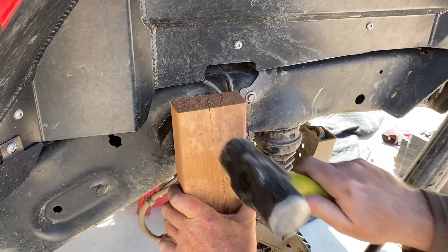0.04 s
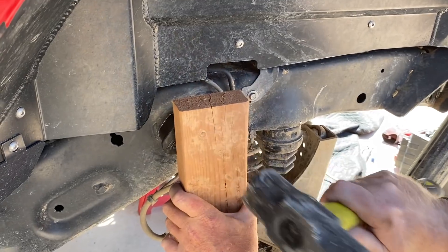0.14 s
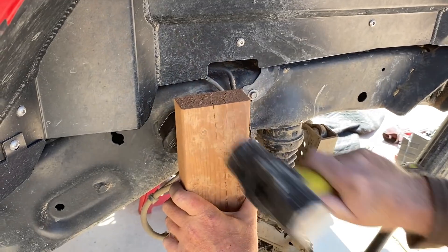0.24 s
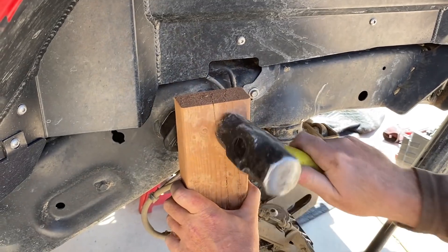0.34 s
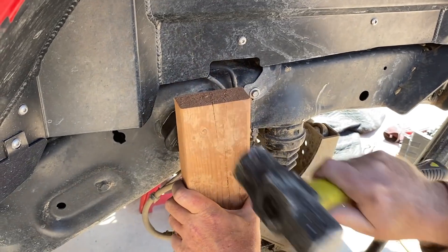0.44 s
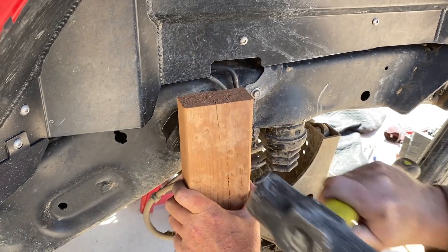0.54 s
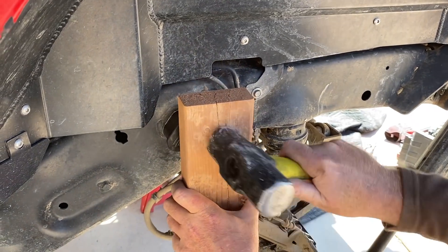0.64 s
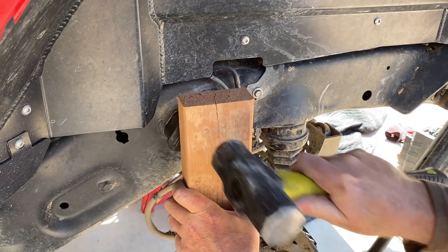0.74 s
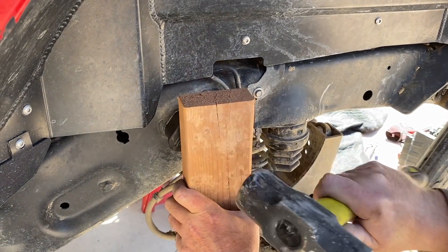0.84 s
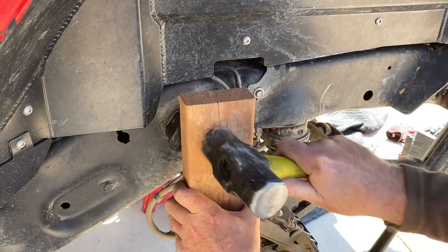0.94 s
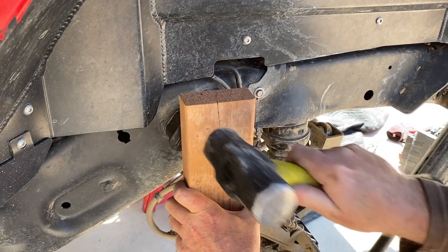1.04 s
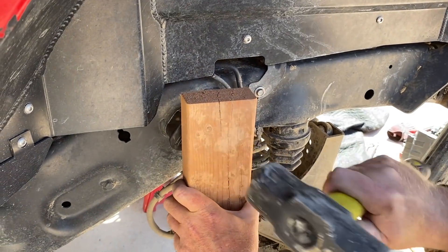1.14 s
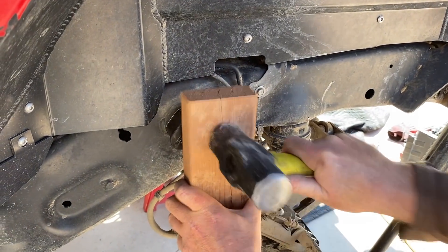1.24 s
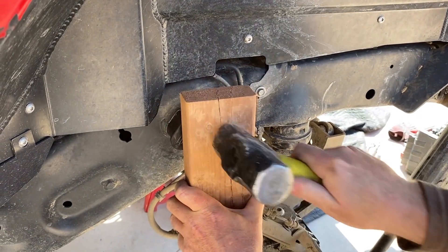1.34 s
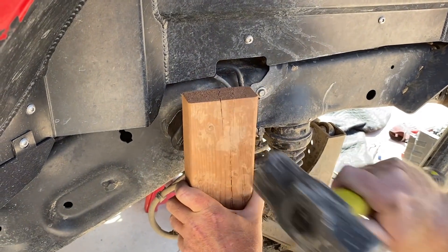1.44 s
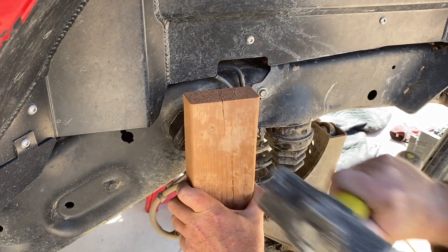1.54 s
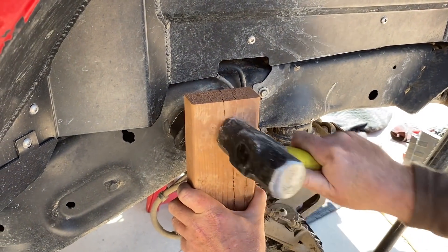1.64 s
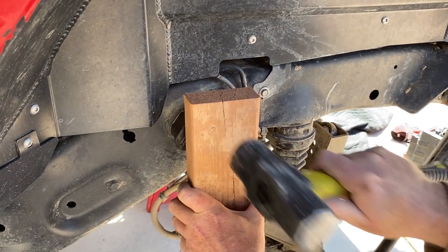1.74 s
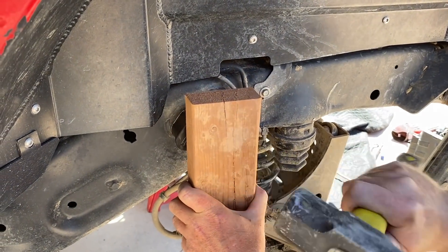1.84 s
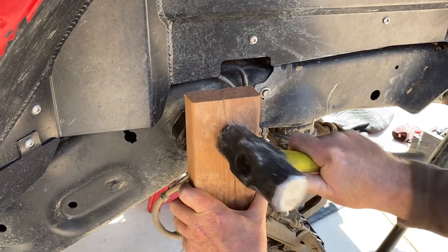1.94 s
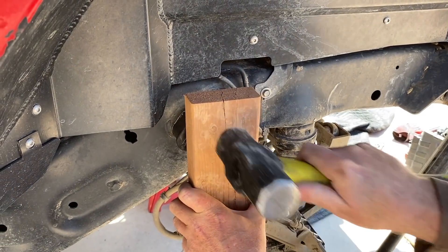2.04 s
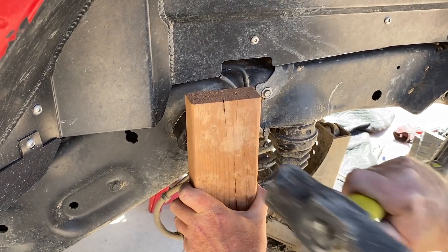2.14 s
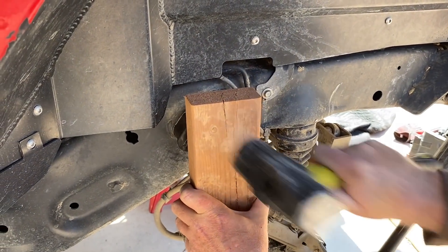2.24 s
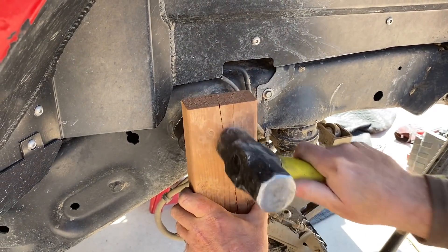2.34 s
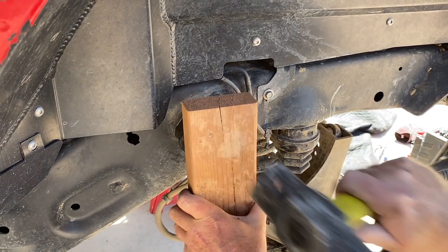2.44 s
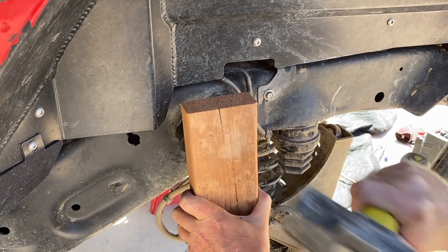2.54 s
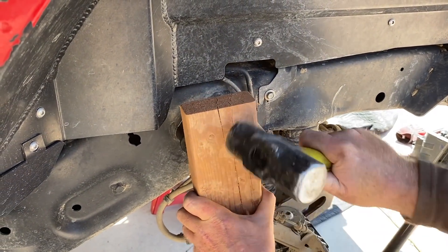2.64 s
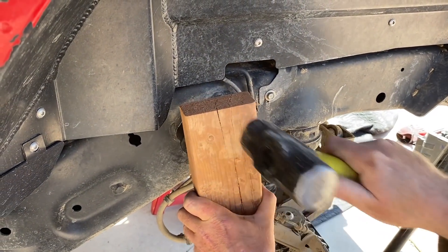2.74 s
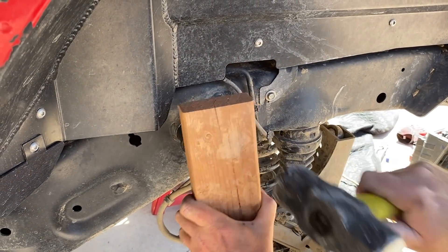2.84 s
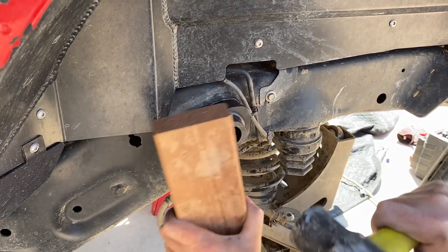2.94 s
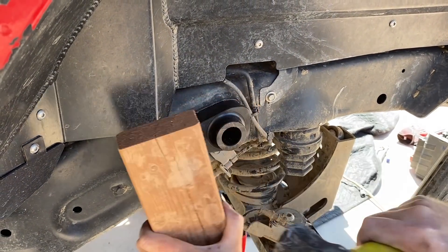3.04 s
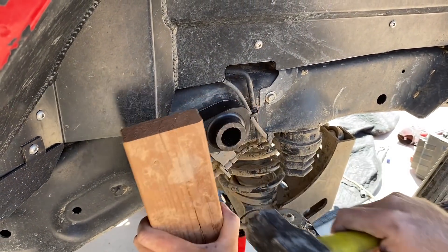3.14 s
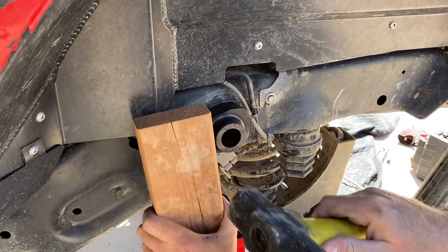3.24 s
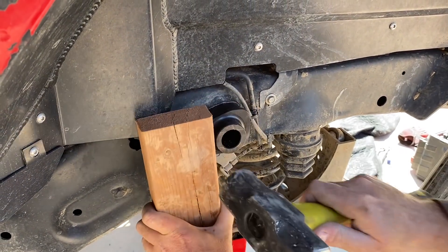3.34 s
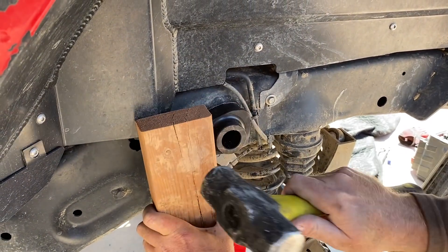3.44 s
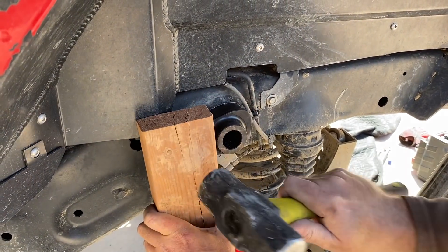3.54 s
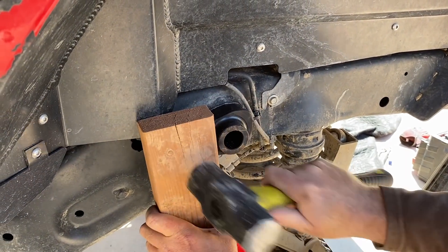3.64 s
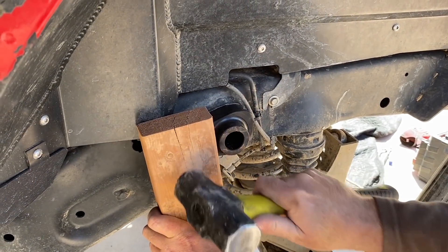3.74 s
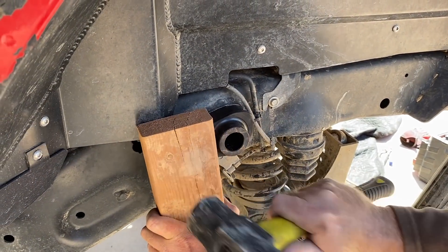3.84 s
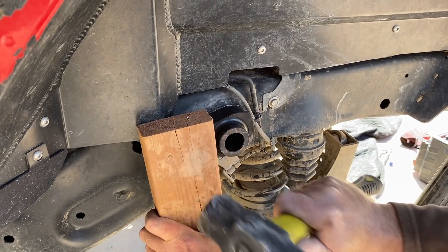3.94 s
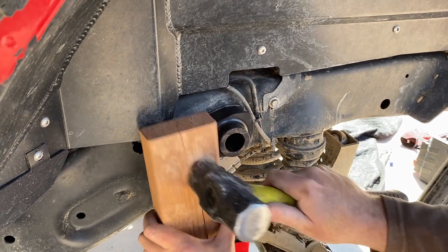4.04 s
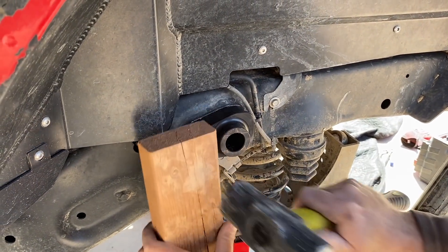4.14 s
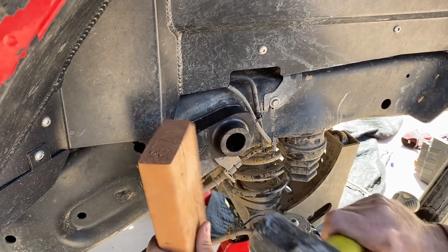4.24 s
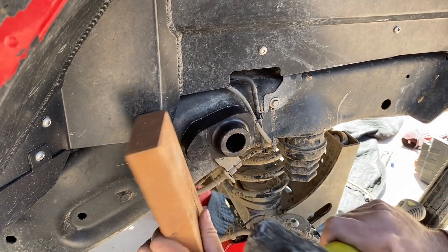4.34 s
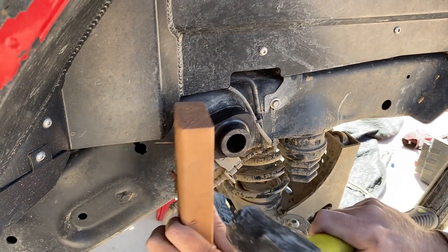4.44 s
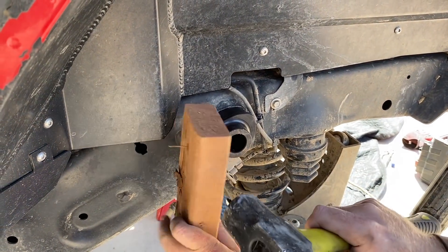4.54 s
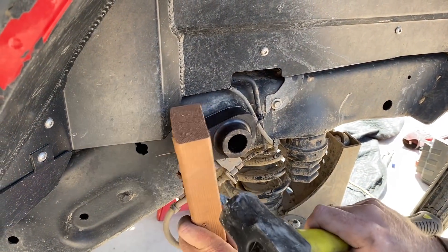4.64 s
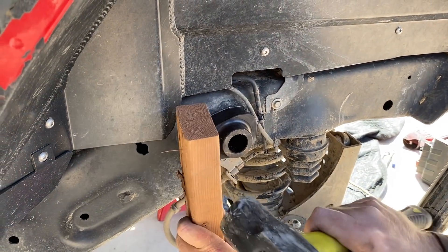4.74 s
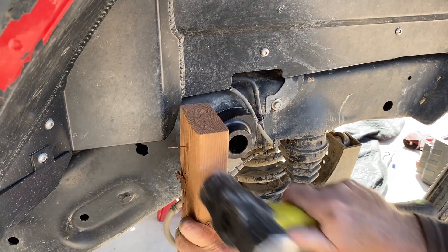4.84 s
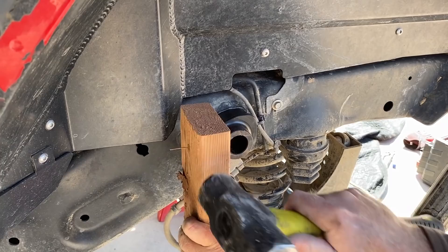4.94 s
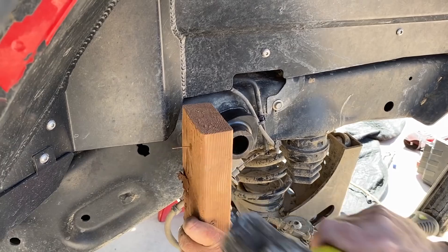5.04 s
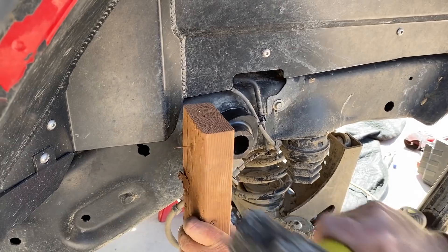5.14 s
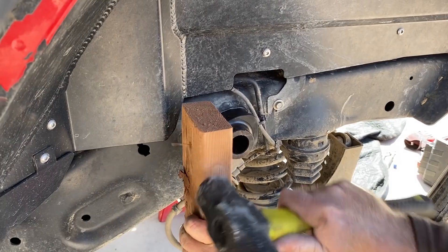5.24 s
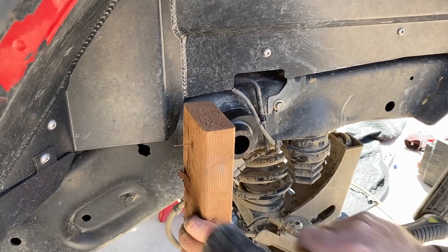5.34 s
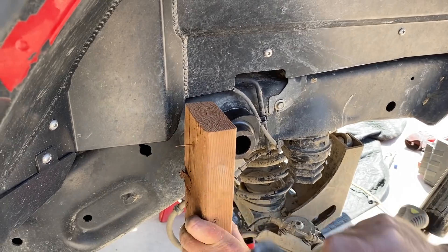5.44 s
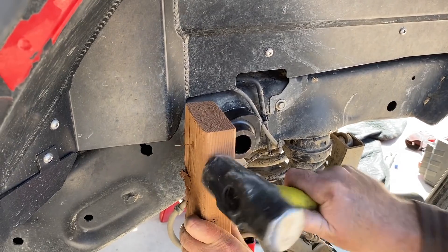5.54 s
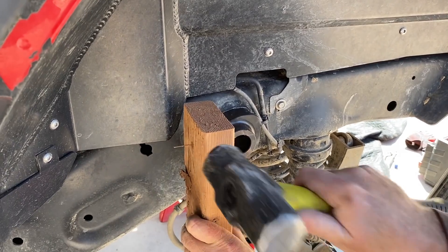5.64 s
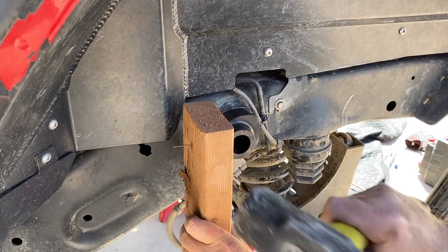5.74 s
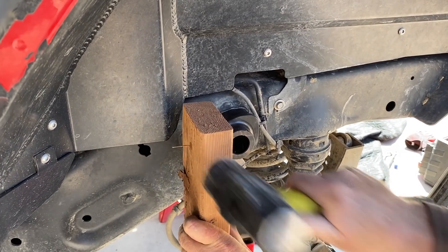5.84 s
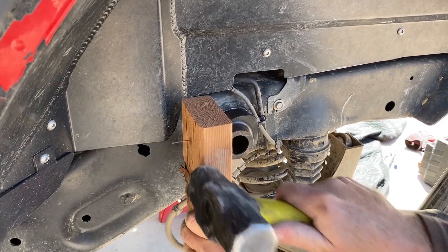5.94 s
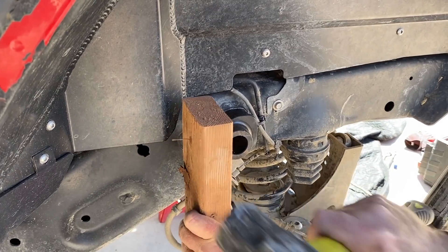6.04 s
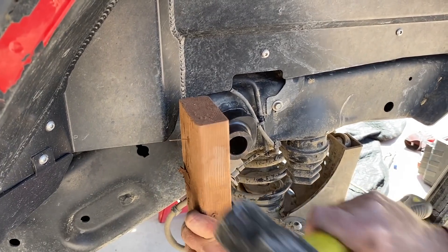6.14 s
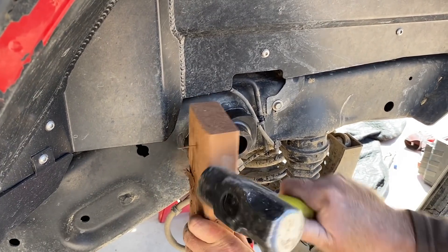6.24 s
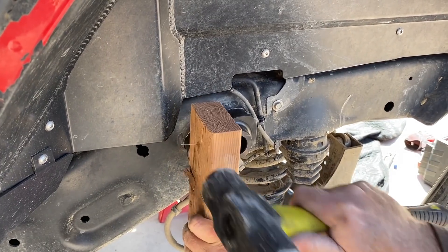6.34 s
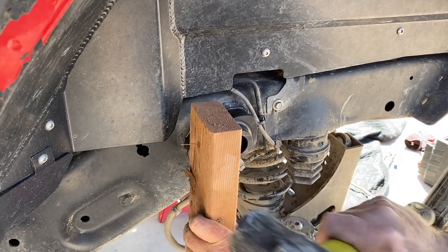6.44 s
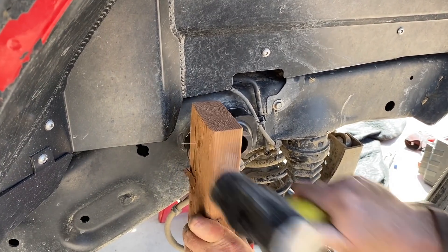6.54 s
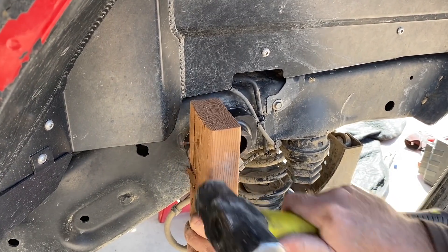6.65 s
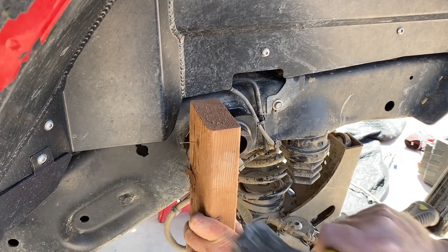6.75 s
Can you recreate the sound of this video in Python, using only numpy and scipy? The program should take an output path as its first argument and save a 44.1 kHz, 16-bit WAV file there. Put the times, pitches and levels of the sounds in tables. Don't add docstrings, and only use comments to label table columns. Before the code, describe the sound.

Outdoors, close to a small microphone, a hammer strikes a hand-held wooden block against a vehicle frame. Loud, woody knocks come three a second, each with a brief metallic rumble. After about nine blows the block is shifted with a scrape and tap, gets two duller knocks, is turned with another scrape, then six brighter blows follow. Faint yard hum lies underneath.

```python
import sys
import numpy as np
from scipy import signal
from scipy.fft import rfft, irfft, next_fast_len
from scipy.io import wavfile
from scipy.ndimage import uniform_filter1d, map_coordinates

SR = 44100
rng = np.random.default_rng(int(sys.argv[2]) if len(sys.argv) > 2 else 0)


def makeup_ratio(level_db):
    decades = np.asarray(level_db, float) / 20
    return 10 ** decades


def unload_audio(sound):
    columns = np.transpose(np.atleast_2d(sound))
    steps = np.round(np.clip(columns, -1, 1) * 32767)
    wavfile.write(sys.argv[1], SR, steps.astype(np.int16))


N = 299439

# f/Hz, level/dB
HUM_COLOUR = [(20, -23.5), (35, -2.5), (60, -2), (200, 1.5), (350, -5.5), (600, -9.5), (1300, -22.5),
              (1580, -13), (1900, -24), (3200, -35.5), (6000, -51)]
# t/s, level/dB
HUM_SWELL = [(0, -66.5), (3.2, -60.5), (3.7, -69.5), (4.5, -64), (4.9, -68.5), (5.8, -63), (6.79, -65.5)]
# t/s, level/dB
SWAY = [(0, -40), (.6, -37.5), (1.3, -37), (2.3, -35), (4.9, -42), (5.5, -43), (6.1, -34), (6.79, -42)]
# f/Hz, level/dB
SWAY_COLOUR = [(1, -12.5), (4, 0), (8, 4.5), (13, -10), (22, -20), (36, -33.5), (70, -120)]
# f/Hz, level/dB
HISS_COLOUR = [(1000, -20), (3000, 3), (5000, 2), (8000, 0), (13000, -3), (17000, -5)]
HISS_DB = -81

# delay/s, level/dB, smear/s, centre f/Hz, spread/ln Hz
WALLS = [
    (.0752, -33.5, .0015, 8500, 1.3),
    (.110, -50, .003, 5500, 1),
    (.2205, -50, .004, 2100, .6),
]
# delay/s, level/dB, smear/s, centre f/Hz, spread/ln Hz
CLUTTER = [(.02, -34.5, .025, 13000, .5), (.05, -28.5, .025, 1213, 1.2), (.15, -53.5, .06, 1477, 0.82),
           (.225, -58.5, .04, 1500, .7)]

# hardest grip t/s, level/dB, slide/s
RUB = [(3.14, -80.5, .09), (3.285, -75, .008), (3.345, -66, .018), (4.22, -74, .03), (4.282, -59, .025),
       (4.412, -62, .005), (4.431, -63, .004), (4.449, -59, .012), (4.506, -70, .009), (4.533, -76, .005),
       (4.615, -75, .018), (4.693, -70, .009), (6.268, -72, .015)]
# f/Hz, level/dB
SKIN_COLOUR = [(880, -40), (1500, -17), (3450, -13), (3720, 3), (4000, -6), (8320, -3), (13700, -9),
               (16000, -20)]
# hardest grip t/s, rumble level/dB, rasp level/dB, slide/s
DRAG = [(3.15, -92, -71, 0.111), (3.293, -55, -69, 0.0135), (3.345, -42, -55, 0.012), (3.42, -56, -76, .02),
        (4.415, -45, -56, 0.0092), (4.445, -42.5, -57.5, 0.0222), (4.53, -59.5, -70, .04)]
# f/Hz, level/dB
RUMBLE_COLOUR = [(90, -70), (200, 2), (350, 6), (600, 1), (900, -7), (1500, -22), (5000, -89)]
# f/Hz, width/Hz, level/dB
RASP_MODES = [(1152, 120, 8), (1460, 26, 3), (2302, 59, -6.5), (2580, 82, -1), (3140, 130, -1),
              (4770, 61, -8), (5250, 75, -1)]
# t/s, level/dB, f/Hz
TICKS = [(.298, -64, 2700), (0.512, -65, 12500), (.52, -70.5, 14000), (3.283, -57.5, 996),
         (3.58, -66, 1500), (3.583, -80, 5500), (4.432, -52, 6000), (4.443, -53, 8980), (4.60, -55, 6440),
         (4.60, -57, 1480), (4.74, -56.5, 1190), (4.83, -61, 1500)]
SLIDE_FADE_RATIO = 1.3

# t/s, strength level/dB, thud level/dB, body level/dB, bite level/dB
FIRST_BLOW = [
    (-0.024, -3.5, -21, -19.5, -4),
]
FLAT_BLOWS = [(0.332, 0.91, -22.5, -11.5, -7.5), (0.672, 2.3, -17.5, -12, -14.5),
              (0.995, 0.43, -14, -8.5, -9.5), (1.306, 2.7, -17.5, -15, -14.5),
              (1.658, 4.5, -23, -13.5, -13), (1.996, 4.5, -19.5, -17.5, -13), (2.329, 3, -15.5, -13, -13),
              (2.677, 1.5, -13.5, -14, -12)]
LOOSE_BLOWS = [
    (3.733, -3, -10.5, -17.5, -33),
    (4.1, -8.5, -3, -8.5, -28.5),
]
TOUCH_BLOWS = [
    (3.334, -24, -7.5, -5, -36),
    (4.405, -28, -13, -1, -27),
]
EDGE_BLOWS = [(4.926, -6.5, -21, -4.5, -9), (5.275, -2, -18.5, -17, -9.5), (5.604, 0, -20, -13, -3),
              (5.925, -4, -12.5, -11.5, -7.5), (6.28, -1.5, -14.5, -14.5, -11), (6.63, -2.5, -16, -17, -7)]
# f/Hz, width/Hz, level/dB
FLAT_WOOD = [(437, 54, -9.5), (615, 48, -20.5), (858, 45, -7), (1098, 77, -7.5), (1179, 110, 4.5),
             (1338, 250, -6), (1480, 25, -14.5), (1737, 36, -26.5), (2047, 310, -14), (2788, 340, -7),
             (3470, 660, -25.5), (4080, 230, -22), (5080, 420, -34.5), (6356, 150, -23)]
LOOSE_WOOD = [(335, 26, -6.5), (406, 49, 5.5), (597, 66, -6), (932, 170, 12), (1210, 90, 2.5),
              (1590, 320, -1), (1980, 83, -23.5), (2580, 83, -25), (3540, 780, 10), (6810, 86, -28.5)]
TOUCH_WOOD = [(322, 17, 3), (346, 30, -3), (405.3, 59, 12.5), (477, 38, -23.5), (614, 18, -1.5),
              (783, 12, -9.5), (910, 83, -11), (1250, 140, -11), (2570, 130, -42), (4200, 300, -28),
              (6330, 250, -23.5)]
EDGE_WOOD = [(440, 120, 0.5), (659, 81, -6.5), (946, 120, 1), (1112, 130, 1.5), (1254, 160, -2),
             (1350, 79, -4.5), (1666, 230, -9.5), (1860, 100, -37.5), (3100, 160, -17.5), (3664, 280, -3.5),
             (3990, 200, -13), (4950, 430, -8.5), (6000, 170, -18.5), (7400, 570, -16)]
# swell/s, frame level/dB, bass level/dB, treble level/dB, click level/dB
HOLDS = [
    (0.002, -2, 3.5, -2, -11.5),
    (0.0033, 0.5, 0, -6.5, -18.5),
    (0.0022, -8, 18.5, -9, -31),
    (0.0024, 1.5, 2, -1, -5),
]
# f/Hz, early level/dB, early t60/s, late level/dB, late t60/s, rise/s
FRAME_BANDS = [(44.7, -54, 0.4, -56, .7, .01), (114, -44.5, 0.36, -40.5, 0.66, 0.059),
               (220, -33.5, 0.34, -31.5, 0.4, 0.042), (450, -17.5, .15, -33, .35, 0.018),
               (1120, -16, 0.082, -21.5, 0.23, 0.011), (2200, -20, 0.065, -27.5, 0.22, 0.00067),
               (4470, -22, 0.071, -47.5, 0.3, .002), (7000, -22.5, 0.027, -39.5, .17, 0.00072),
               (10500, -33, .035, -43, .165, .001), (15000, -43, 0.025, -51, .15, 0.0016)]
STEEL_HZ = [49, 120, 183, 231, 316, 350, 1287, 1351, 1599, 2250, 2640, 2724]
# level/dB, t60/s
STEEL_DECAY = [(-43, .45), (-46, .9), (-48, .6), (-50, .9), (-48, .8), (-52, .7), (-62, .5), (-61, .8),
               (-63, .5), (-55, .6), (-66, .9), (-70, .5)]
MODE_SCATTER_DB = 1.7
TOP_PER_BITE = 0.8


def unit(x):
    return x / np.sqrt(np.mean(x ** 2) + 1e-20)


def along(points, hz):
    f, v = np.transpose(points)
    return np.interp(np.log(hz + 1), np.log(f + 1), v)


def over_time(points):
    return makeup_ratio(np.interp(np.arange(N) / SR, *np.transpose(points)))


def filtered(x, gain):
    m = next_fast_len(x.shape[-1] + 8192)
    return irfft(rfft(x, m) * gain(np.fft.rfftfreq(m, 1 / SR)), m)[..., :x.shape[-1]]


def noise(spectrum):
    return unit(filtered(rng.standard_normal(N), lambda hz: makeup_ratio(along(spectrum, hz))))


def add(track, s, sound):
    track[SR + round(s * SR):][:len(sound)] += sound


def grain(rate_hz, depth_db):
    knots = rng.standard_normal(int(N * rate_hz / SR) + 4)
    return makeup_ratio(depth_db * map_coordinates(knots, [np.arange(N) * rate_hz / SR]))


def strokes(rows, column):
    rows, t = np.array(rows), np.arange(0, N / SR, .001)
    late = (t - rows[:, :1]) / np.abs(rows[:, -1:])
    late = late / np.where(late > 0, SLIDE_FADE_RATIO, 1)
    gain = np.sum(makeup_ratio(rows[:, [column]]) * np.exp(-late ** 2), axis=0)
    return np.interp(np.arange(N) / SR, t, gain)


def yard():
    hum = over_time(HUM_SWELL) * grain(5, depth_db=1.2) * noise(HUM_COLOUR)
    breeze = over_time(SWAY) * grain(3, depth_db=3.5) * noise(SWAY_COLOUR)
    return hum + breeze + makeup_ratio(HISS_DB) * noise(HISS_COLOUR)


def walls(x):
    answer, t = np.zeros(SR), np.arange(SR // 3) / SR
    for delay_s, db, smear_s, centre_hz, spread in [*WALLS, *CLUTTER]:
        rough = rng.standard_normal(len(t)) * np.exp(-t / smear_s)
        band = lambda hz: makeup_ratio(db) * np.exp(-(np.log((hz + 1) / centre_hz) / spread) ** 2)
        answer[round(delay_s * SR):][:len(t)] += filtered(rough / np.linalg.norm(rough), band)
    return signal.fftconvolve(x, answer)[:len(x)]


def palm():
    return strokes(RUB, column=1) * unit(grain(290, depth_db=2.2) * noise(SKIN_COLOUR))


def steel_resonance(f):
    peaks = sum(makeup_ratio(db) * w / np.hypot(2 * (f - c), w) for c, w, db in RASP_MODES)
    return 0.25 / (1 + (f / 3000) ** 4) + peaks


def drag():
    rasp = unit(filtered(grain(90, depth_db=3.0) * rng.standard_normal(N), steel_resonance))
    return strokes(DRAG, column=1) * noise(RUMBLE_COLOUR) + strokes(DRAG, column=2) * rasp


def ticks():
    taps, life = np.zeros(N + 2 * SR), np.arange(SR // 20) / SR
    for s, db, hz in TICKS:
        band = lambda f: 1 / (1 + (3.8 * np.log((f + 1) / hz)) ** 4)
        puff = filtered(rng.standard_normal(len(life)), band)
        add(taps, s, makeup_ratio(db - 60 * life / .015) * unit(puff))
    return taps[SR:SR + N]


def frame(t, share, colour, shake, ring):
    hz, early_db, early_s, late_db, late_s, rise_s = np.transpose(FRAME_BANDS)[:, :, None]
    tones = np.abs(rfft(ring, len(t))) + 1e-9
    tones = (tones / uniform_filter1d(tones, size=len(t) // 50)) ** .33
    bands = irfft(rfft(shake) * tones * share, len(t))
    bands = bands / bands.std(axis=1, keepdims=True)
    fall = makeup_ratio(early_db - 60 * t / early_s) + makeup_ratio(late_db - 60 * t / late_s)
    rise = 1 - np.exp(-t / np.abs(rise_s))
    knots = makeup_ratio(np.where(hz < 600, .8, 2.9) * rng.standard_normal((len(FRAME_BANDS), 64)))
    rattle = np.array([np.interp(t * 120, np.arange(len(row)), row) for row in knots])
    rumble = np.sum(bands * fall * rattle * makeup_ratio(along(colour, hz)) * rise, axis=0)
    for mode_hz, (db, t60_s) in zip(STEEL_HZ, STEEL_DECAY):
        size = makeup_ratio(db + rng.normal(0, 2.5) - 60 * t / t60_s) * (1 - np.exp(-t / .01))
        rumble += size * np.sin(2 * np.pi * (mode_hz * t + rng.random()))
    return rumble * np.clip((t[-1] - t) / 0.07, 0, 1)


def block(t, wood, colour, build_s, click_db, scatter_db):
    hz, width_hz, db = np.transpose(wood)[:, :, None]
    level_luck, pitch_luck, phase_luck = rng.standard_normal((3, len(wood), 1))
    swell = (1 - np.exp(-t * hz / (1000 * build_s))) ** 2
    decay = np.exp(-np.pi * np.abs(width_hz) * t)
    size = makeup_ratio(db + along(colour, hz) + scatter_db * level_luck) * swell * decay
    side = (-1) ** np.arange(len(wood))[:, None]
    phase = 2 * np.pi * hz * (1 + .012 * pitch_luck) * t + .3 * phase_luck
    ring = np.sum(side * size * np.sin(phase), axis=0)
    seated = .3 + .7 * np.exp(-(t / .0062) ** 4)
    fade = np.clip((t[-1] - t) / .02, 0, 1)
    click_amp = makeup_ratio(along(colour, 3600) + click_db)
    click = -click_amp * np.sin(2 * np.pi * 4500 * t) * makeup_ratio(-60 * t / 0.0017)
    return seated * ring * fade + click


def hammer():
    wood_track, frame_track = np.zeros(N + 2 * SR), np.zeros(N + 2 * SR)
    t = np.arange(SR // 2) / SR
    grid_hz, centres_hz = np.fft.rfftfreq(len(t), 1 / SR), np.transpose(FRAME_BANDS)[0]
    share = np.array([along(np.c_[centres_hz, row], grid_hz) for row in np.eye(len(FRAME_BANDS))])
    usual = rng.standard_normal(len(t))
    series = zip(([*FIRST_BLOW, *FLAT_BLOWS], LOOSE_BLOWS, TOUCH_BLOWS, EDGE_BLOWS),
                 (FLAT_WOOD, LOOSE_WOOD, TOUCH_WOOD, EDGE_WOOD), HOLDS)
    for blows, wood, (build_s, frame_db, bass_db, treble_db, click_db) in series:
        for s, db, *balance in blows:
            thud_db, body_db, bite_db = balance - np.mean(blows, axis=0)[2:]
            top_db = TOP_PER_BITE * bite_db
            wood_colour = [(450, thud_db), (880, body_db), (1200, 0.0072), (3600, bite_db), (9000, top_db)]
            ring = block(t[:SR // 16], wood, wood_colour, build_s, click_db, MODE_SCATTER_DB)
            frame_colour = [(130, 1.1 * bass_db), (400, bass_db + .5 * thud_db), (1200, 0),
                            (3600, treble_db + 0.67 * bite_db), (9000, treble_db + 0.91 * top_db)]
            shake = .6 * usual + .8 * rng.standard_normal(len(t))
            add(wood_track, s, makeup_ratio(db + 8.5) * ring)
            add(frame_track, s, makeup_ratio(db + frame_db) * frame(t, share, frame_colour, shake, ring))
    return wood_track + frame_track


def scene():
    blows = hammer()
    struck = (blows + walls(blows))[SR:SR + N]
    handling = palm() + drag() + ticks()
    return (struck + handling + yard())[None]


def top_cut(x):
    return signal.sosfilt(signal.butter(12, 15850, fs=SR, output="sos"), x)


def record(dry):
    mix = np.clip(dry, -.99, .99)
    return top_cut(mix)


dry = scene()
out = record(dry)
unload_audio(out)
```